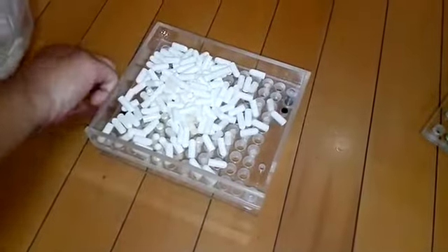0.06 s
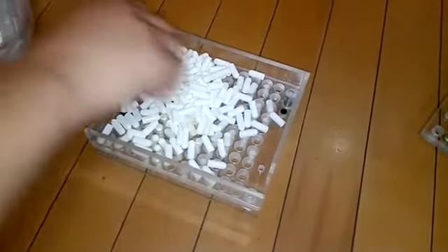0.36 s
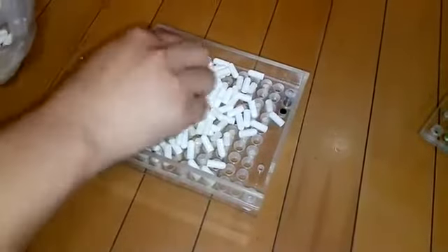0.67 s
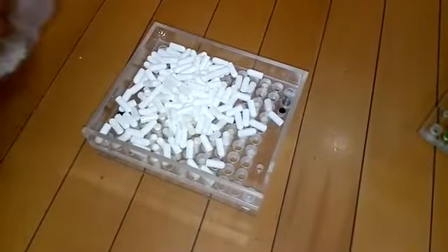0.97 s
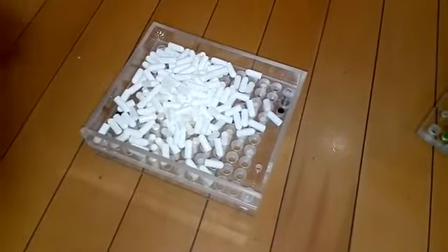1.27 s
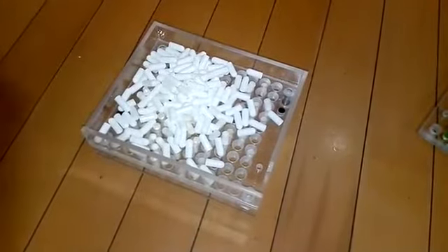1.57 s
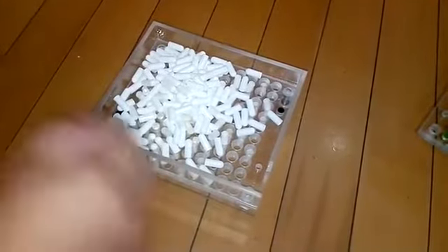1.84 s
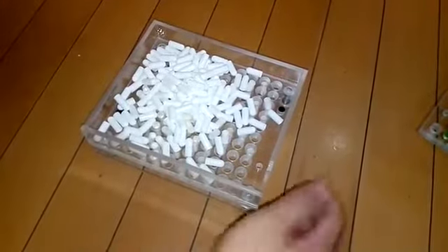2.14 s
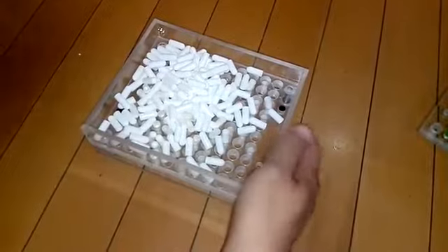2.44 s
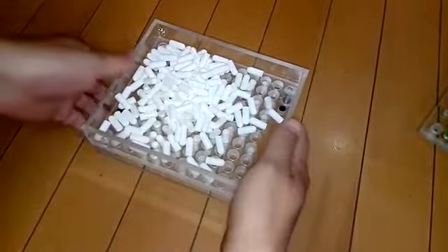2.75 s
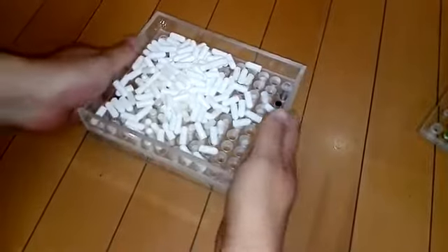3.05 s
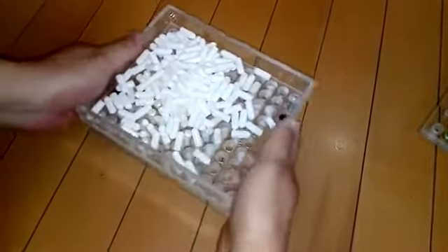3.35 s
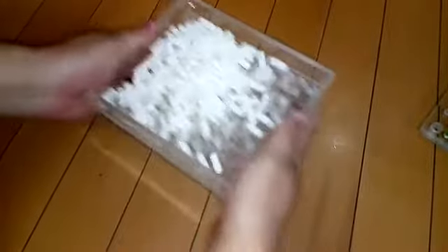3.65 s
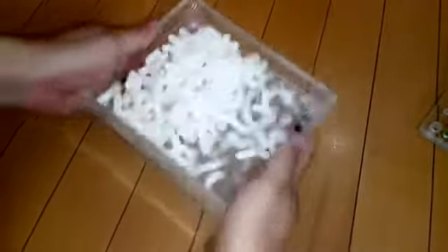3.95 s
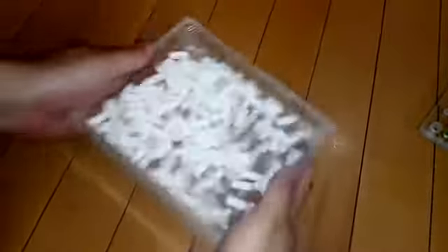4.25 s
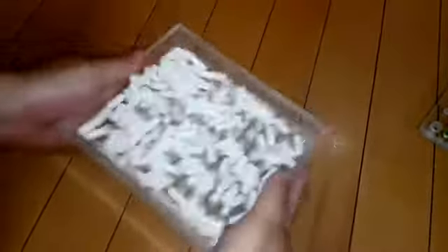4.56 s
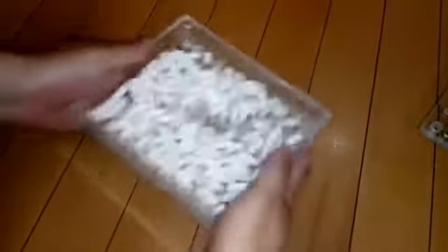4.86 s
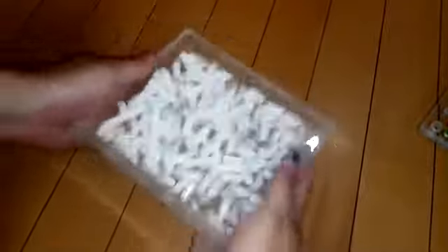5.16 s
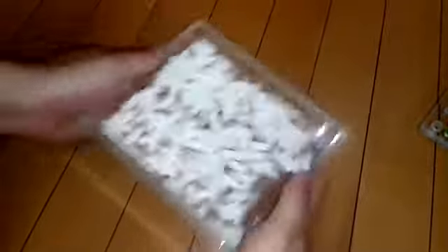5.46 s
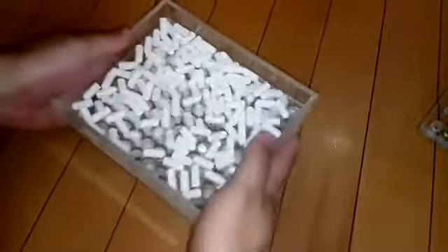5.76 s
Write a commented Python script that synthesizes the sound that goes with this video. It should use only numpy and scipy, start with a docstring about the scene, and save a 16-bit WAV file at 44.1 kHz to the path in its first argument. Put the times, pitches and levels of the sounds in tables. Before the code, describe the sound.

A plastic bag rustles briefly, then small plastic capsules click and rattle loudly as a plastic tray is lifted and shaken.

```python
"""A plastic bag rustles, faintly at first, as it is moved aside and its thin film creases.
Fingers brush a heap of small, hollow plastic capsules in a plastic tray on a wooden floor.
Hands slide onto the tray, which knocks and scrapes on the boards as it is lifted.
One capsule bounces to rest, its shell ringing at each landing. Then the whole heap slides and
rattles, surging at each stroke as the tray is shaken. A small room adds a short echo."""
import sys
import numpy as np
from scipy import signal
from scipy.fft import rfft, irfft, next_fast_len
from scipy.io import wavfile
from scipy.ndimage import map_coordinates

SR = 44100
rng = np.random.default_rng(int(sys.argv[2]) if len(sys.argv) > 2 else 0)


def store_pcm(level_fs):
    """Save levels as 16-bit WAV."""
    pcm = np.round(np.clip(level_fs, -1, 1) * 32767).astype(np.int16)
    wavfile.write(sys.argv[1], SR, np.atleast_2d(pcm).T)


N = 256659

# A level_db compares rows of one table; the functions set the final loudness.
# A fade_s is the time a sound takes to die away by 60 dB.
# tone of the still air: pitch_hz, level_db
AIR_TONE = [(30, -1.5), (120, -23.5), (230, -11.5), (400, -22.5), (630, -24.5), (1000, -20), (2000, -21.5),
            (4000, -43), (6500, -32), (10000, -32.5), (14000, -45)]
# moves of the bag: start_s, level_db, rise_s, hold_s, fade_s
BAG_MOVES = [(0.0, -69.5, 0.0037, 0.64, .1), (.52, -59, .12, 0.044, .17), (.852, -35.7, 0.105, .085, 0.7),
             (1.1, -57.5, 0.068, 0.33, 0.59), (1.365, -42.3, 0.085, 0.085, 0.38),
             (1.78, -58.5, 0.16, 0.078, 0.12)]
# tone of the bag's fine crinkle: pitch_hz, level_db
CRINKLE_TONE = [(530, -30), (900, -20.5), (1060, -19.5), (1500, -14.5), (1780, -14.5), (2400, -12),
                (2720, -9), (3430, -8.5), (4130, -4), (5020, -3), (5900, -11.5), (7350, -15), (9690, -25.5),
                (11900, -30.5), (14200, -40)]
# tone of the bag's larger folds: pitch_hz, level_db
FOLD_TONE = [(100, -30), (170, -0.5), (250, -1.5), (380, 0.5), (520, -12), (750, 4.5), (950, 3.5),
             (1300, -9), (1600, -7), (2200, -13), (6000, -17)]
# single capsules clicking inside the bag: start_s, level_db, pitch_hz
BAG_CAPSULE_CLICKS = [(0.096, -50, 3800), (0.197, -52, 4680), (0.242, -46, 4900), (1.0479, -21, 5100),
                      (1.0566, -23, 4250), (1.338, -31, 4650), (1.6822, -50, 3690), (1.7535, -48, 4660),
                      (1.8693, -46, 4690), (1.9077, -45, 4880), (1.9625, -39, 4610)]
# the tray's edge meeting the floor: start_s, level_db, favoured_pitch_hz, falloff_db_per_octave
TRAY_KNOCKS = [(.094, -50.5, 450, 7), (2.612, -52, 795, 5), (2.689, -53, 900, 8), (2.758, -31.5, 716, 20),
               (2.901, -28.5, 1120, 3), (2.990, -28, 490, 7)]
# notes of the tray and floorboards ringing together: pitch_hz, level_db, fade_s
TRAY_NOTES = [(185, -10, 0.17), (245, -7.5, 0.13), (420, -8.5, 0.07), (478, -10, 0.07), (580, -6.5, 0.05),
              (716, -2, 0.028), (1022, 1, 0.045), (1125, 0, 0.028), (1225, 0, 0.018), (2050, -2.5, 0.016)]
# how well the tray and its base plate give off each pitch: pitch_hz, level_db
TRAY_TONE = [(100, -57), (260, -35), (400, -32), (550, -31.5), (1000, -12.5), (1180, -15.5), (1570, -6),
             (1720, -8.5), (1950, -3), (2250, -3.5), (2480, -5.5), (2950, -1.5), (3300, -2.5), (3780, -1.5),
             (4450, -2), (4700, -2), (5100, 0), (6800, -3), (8300, -14), (10000, -21), (12000, -22),
             (14300, -34.5)]
# capsules nudged by a fingertip or a jolt of the tray: start_s, level_db, pitch_hz
CAPSULE_NUDGES = [(.4205, -52, 4910), (.4865, -48, 3770), (.4998, -41, 4450), (.5312, -46, 3970),
                  (.5504, -49, 3850), (.5715, -44, 4500), (.6434, -44, 4300), (.7033, -50, 4860),
                  (.7213, -48, 4770), (2.6358, -45, 4580), (2.6882, -46, 3730), (2.766, -44, 4510),
                  (2.7795, -39, 3780), (2.8383, -45, 4330), (2.9017, -39, 4430)]
# runs of faint, fine ticking: start_s, level_db, rise_s, hold_s, fade_s
TICKING_RUNS = [(.43, -59.5, .08, .13, .18), (1.665, -59.5, .06, .13, .6), (2.8, -55, .03, .07, .3),
                (3.19, -52, .03, .04, .25)]
# hands sliding onto the tray: start_s, level_db, rise_s, hold_s, fade_s
HAND_SLIDES = [(2.0, -73.5, 0.17, 0.43, 0.33), (2.2, -68, 0.26, 0.088, 0.27),
               (2.42, -60.5, 0.1, 0.706, 0.36), (2.76, -53, 0.011, 0.0067, 0.17)]
# tone of skin rubbing the rim: pitch_hz, level_db
SKIN_TONE = [(240, -48), (400, -10), (694, -8.5), (854, -11), (991, -6.5), (1260, -8.5), (2150, -3),
             (2690, 0.5), (4200, 1.5), (5200, 1.5), (7170, -10.5), (14000, -29)]
# a loose capsule dropping on the tray:
# start_s, level_db, pitch_hz, ring_length_ratio, snap_offset_db, first_flight_s, landing_count
CAPSULE_DROPS = [(3.0805, -20, 4100, .65, -18, 0, 1), (3.105, -23, 4130, .65, -16, .0335, 3),
                 (3.189, -29, 4100, .6, -21, .0146, 7), (3.278, -24.5, 3930, .9, 4, 0, 1),
                 (3.373, -24, 3930, 1.05, 2.5, 0, 1), (3.4665, -23.5, 3930, 1.0, 2, 0, 1),
                 (3.5215, -26, 3950, .9, -2, 0, 1), (3.5586, -30, 3930, 1.0, -3, .031, 2),
                 (3.6007, -28.5, 3840, .7, -12, 0, 1)]
# notes of the bouncing capsule's shell: pitch_ratio, level_db, fade_s
SHELL_NOTES = [(0.276, -11.5, 0.024), (0.41, -8, 0.009), (0.55, -6.5, 0.012), (0.769, -8.5, 0.012),
               (0.959, 2.5, 0.011), (1.007, 3.5, 0.013), (1.18, -3, .008), (1.32, -19, 0.046),
               (1.651, -5, 0.0043)]
# strokes of the shaking, each throwing the heap against a wall: arrival_s, level_db, hold_s
SHAKE_STROKES = [(3.78, -40.5, 0.041), (3.91, -35, 0.038), (4.075, -38.5, 0.014), (4.194, -34, 0.1),
                 (4.577, -36, 0.022), (4.898, -34.5, 0.1), (5.15, -37, 0.053), (5.31, -39, 0.12),
                 (5.495, -33, 0.073), (5.81, -31, .02)]
# the hardest hits of capsules on the tray's walls: start_s, level_db, pitch_hz
WALL_HITS = [(3.6657, -32, 4530), (3.7146, -32, 4420), (3.7723, -19, 4660), (3.8822, -21, 3750),
             (3.923, -18, 4060), (3.9559, -20, 4220), (3.9885, -19, 3980), (4.0089, -19, 4890),
             (4.0573, -20, 3920), (4.0888, -20, 5330), (4.136, -15, 4700), (4.1735, -15, 4640),
             (4.1895, -16, 3760), (4.2255, -18, 4130), (4.2305, -17, 4500), (4.2792, -14, 3780),
             (4.3748, -15, 4840), (4.4484, -18, 4910), (4.5128, -22, 3910), (4.5735, -20, 3900),
             (4.5908, -14, 3950), (4.633, -20, 4030), (4.6425, -21, 3690), (4.656, -19, 3800),
             (4.7366, -19, 5600), (4.7682, -23, 4540), (4.8663, -16, 4600), (4.9007, -17, 3750),
             (4.9037, -11.5, 3750), (4.9383, -16.5, 4700), (4.9502, -18, 3850), (4.987, -20, 4400),
             (5.0396, -20, 4400), (5.0848, -17, 4700), (5.1542, -14, 4200), (5.1956, -17.5, 4340),
             (5.2015, -17, 4100), (5.214, -20, 4300), (5.2528, -21, 4080), (5.296, -19, 4060),
             (5.3529, -21, 5560), (5.3717, -15, 4070), (5.4362, -20, 4170), (5.4811, -16, 4460),
             (5.4877, -14.5, 4600), (5.4978, -17, 5100), (5.5035, -18, 4450), (5.5115, -19, 4400),
             (5.519, -13, 4950), (5.536, -15, 4350), (5.5405, -15, 4900), (5.558, -18, 4500),
             (5.6018, -18, 4960), (5.6743, -22, 3860), (5.7076, -22, 4340), (5.7237, -16, 3770),
             (5.7297, -17, 3840), (5.7894, -15, 3850), (5.809, -16, 3900)]
# how alike left and right sound (1 is the same, 0 unrelated): pitch_hz, likeness_ratio
STEREO_LIKENESS = [(60, .999), (130, 1), (300, 0.77), (700, 0), (2000, 0.97), (8000, 0.25)]
# how long the room echoes: pitch_hz, fade_s
ROOM_FADES = [(200, 0.29), (1000, 0.27), (4000, 0.38), (12000, 0.076)]

SLIDE_START_S = 3.57  # the tray tilts and the heap starts to slide


def amp(db):
    """Turn decibels into a number to multiply by."""
    return 10 ** (np.asarray(db) / 20)


def unit(x):
    """Scale a sound to an average strength (rms) of 1."""
    return x / np.sqrt(np.mean(x ** 2) + 1e-20)


def fade(t, fade_s):
    """Die away, reaching 60 dB down after fade_s."""
    return np.exp(-np.log(1000) * t / fade_s)


def along(points, hz):
    """Read between the rows of a (pitch_hz, value) table, spacing octaves evenly."""
    pitches, values = np.transpose(points)
    return np.interp(np.log(hz + 1), np.log(pitches + 1), values)


def filtered(x, response):
    """Multiply each pitch in a sound by response(hz)."""
    size = next_fast_len(N + SR // 2)
    return irfft(rfft(x, size) * response(np.fft.rfftfreq(size, 1 / SR)), size)[..., :N]


def coloured(x, tone, size=4096):
    """Give a sound the tone in a table, keeping the sharp start of each click."""
    cepstrum = irfft(np.log(amp(along(tone, np.fft.rfftfreq(size, 1 / SR)))))
    # move all of the filter's ringing to after the click
    cepstrum[1:size // 2] *= 2
    cepstrum[size // 2 + 1:] = 0
    click_response = irfft(np.exp(rfft(cepstrum)))
    return signal.fftconvolve(x, click_response[None], axes=1)[:, :N]


def band(x, low_hz, high_hz, order=3):
    """Keep a range of pitches: a slow contact makes little treble, a small body little bass."""
    return signal.sosfilt(signal.butter(order, [low_hz, high_hz], "bandpass", fs=SR, output="sos"), x)


def spread(pair):
    """Blend two unrelated sounds into a left and right that are alike in the bass."""
    def shares(hz):
        angle = np.arccos(np.clip(along(STEREO_LIKENESS, hz), -1, 1)) / 2
        return np.array([np.cos(angle), np.sin(angle)])
    mid, side = filtered(pair, shares)
    return unit(np.array([mid + side, mid - side]))


def panned(db):
    """Left and right gains, with the left louder by db."""
    return amp(np.array([db, -db]) / 2)


def lagged(pair, lag_s=.00136, share=.25):
    """Part of the sound on the left reaches the right a moment later."""
    late = filtered(pair[0], lambda hz: np.exp(-2j * np.pi * hz * lag_s))
    return np.array([pair[0], np.sqrt(1 - share ** 2) * pair[1] + share * late])


def place(times, waves):
    """Add short waves, shaped (2, events, samples), to a stereo track at their times."""
    at = np.round(np.abs(times) * SR).astype(int)[:, None] + np.arange(waves.shape[-1])
    return np.array([np.bincount(at.ravel(), side.ravel(), N)[:N] for side in waves])


def wobble(per_s):
    """A smooth curve through per_s random values a second."""
    return map_coordinates(rng.standard_normal(int(N * per_s / SR) + 4), [np.arange(N) * per_s / SR])


def swell(start_s, level_db, rise_s, hold_s, fade_s):
    """The loudness of one movement: it rises smoothly, holds and dies away."""
    t = np.arange(N) / SR - start_s
    rise = np.sin(np.pi / 2 * np.clip(t / rise_s, 0, 1)) ** 2
    return amp(level_db) * rise * fade(np.maximum(t - rise_s - hold_s, 0), fade_s)


def swells(rows):
    """The combined loudness of overlapping movements."""
    return np.sqrt(sum(swell(*row) ** 2 for row in rows))


def shifting(x, depth_db, width_hz, life_s, size=256):
    """As loose things shift about, each range of pitches swells and sinks by itself."""
    hz, t, spectrum = signal.stft(x, SR, nperseg=size)
    grid = rng.standard_normal((int(hz[-1] / width_hz) + 4, int(t[-1] / life_s) + 4))
    drift = map_coordinates(grid, np.meshgrid(hz / width_hz, t / life_s, indexing="ij"))
    shifted = signal.istft(spectrum * amp(depth_db * np.clip(drift, -2, 1.5)), SR, nperseg=size)[1][:, :N]
    return shifted * np.linalg.norm(x) / np.linalg.norm(shifted)


def crackle(per_s, scatter_db, hiss):
    """Tiny snaps of mixed sizes over the hiss of rubbing."""
    count = int(per_s * N / SR)
    sizes = amp(scatter_db * np.clip(rng.standard_normal(count), -2, 2))
    snaps = place(rng.uniform(0, N / SR, count), (sizes * rng.standard_normal((2, count)))[..., None])
    return unit(unit(snaps) + hiss * rng.standard_normal((2, N)))


def clacks(hz, fade_s, crack, crack_fade_s, phase_spread=np.pi, size=640):
    """One equally strong clack per pitch: a crack of contact plus the ring of thin plastic."""
    t = np.arange(size) / SR
    chance = rng.standard_normal((len(hz), 2, size + 2)).transpose(1, 0, 2)
    phase = phase_spread * chance[..., :1]  # each lies at its own distance from left and right
    ring_s = fade_s * amp(2.0 * chance[0, :, 1:2])  # its neighbours muffle it more or less
    ring = np.sin(2 * np.pi * hz[:, None] * t + phase) * fade(t, ring_s)
    contact = crack * np.tanh(chance[..., 2:]) * fade(t, crack_fade_s)
    waves = (ring + contact) * (1 - np.exp(-t / 0.00029))
    return waves * np.linalg.norm(fade(t, fade_s)) / np.linalg.norm(waves, axis=-1, keepdims=True) / 2


def collisions(start_s, end_s, per_s, scatter_db, fade_s, crack, shell_hz=4400, pitch_spread=0.1194):
    """Capsules clack in the tray at random times, sizes and pitches."""
    count = int(per_s * (end_s - start_s))
    times = rng.uniform(start_s, end_s, count)
    size, detune = rng.standard_normal((2, count))
    sizes = amp(scatter_db * np.clip(size, -2, 1.4))
    hz = shell_hz * np.exp(pitch_spread * detune)
    waves = sizes[:, None] * clacks(hz, fade_s, crack, crack_fade_s=.006)
    return unit(coloured(place(times, waves), TRAY_TONE)) * np.sqrt((end_s - start_s) * SR / N)


def room_tone():
    """Faint air noise, and a low drone that is the same on both sides."""
    air = spread(filtered(rng.standard_normal((2, N)), lambda hz: amp(along(AIR_TONE, hz))))
    drone = unit(band(rng.standard_normal(N), low_hz=40, high_hz=60, order=2))
    return amp(-72.5) * air + amp(-80) * drone


def bag_rustle():
    """Thin film crinkles in countless creases, while its larger folds flutter lower down."""
    crinkle = unit(coloured(crackle(per_s=1300, scatter_db=3.5, hiss=.9), CRINKLE_TONE))
    crinkle = shifting(crinkle, depth_db=3, width_hz=380, life_s=.024)
    folds = spread(coloured(crackle(per_s=500, scatter_db=3.5, hiss=1.0), FOLD_TONE))
    start_s, db, hz = np.transpose(BAG_CAPSULE_CLICKS)
    capsule_clicks = clacks(hz, fade_s=0.0091, crack=0.79, crack_fade_s=0.012, phase_spread=0.65)
    snaps = coloured(place(start_s, amp(db)[:, None] * capsule_clicks), TRAY_TONE)
    bunches = amp(1.2 * wobble(per_s=92))  # creases give way in small bunches
    film = bunches * swells(BAG_MOVES) * (amp(0.5) * crinkle + amp(-19.5) * folds)
    return (film + amp(8.5) * snaps) * panned(1.3)[:, None]


def tray_knocks():
    """The tray's edge bumps the boards; where it lands decides which notes ring most."""
    start_s, db, favoured_hz, falloff_db = np.transpose(TRAY_KNOCKS)
    count = len(start_s)
    t = np.arange(SR // 6) / SR
    waves = np.zeros((2, count, len(t)))
    for hz, note_db, fade_s in TRAY_NOTES:
        octaves_away = np.abs(np.log2(hz / favoured_hz))
        strength = amp(db + note_db - falloff_db * octaves_away + rng.normal(0, 1, count))
        phase = rng.normal(0, 0.95, (count, 1)) + rng.normal(0, 0.26, (2, count, 1))
        waves += strength[:, None] * np.sin(2 * np.pi * hz * t + phase) * fade(t, fade_s)
    knocks = band(place(start_s, waves * (1 - np.exp(-t / 0.00047))), low_hz=136, high_hz=2420)
    return amp(-5.5) * knocks * panned(5.7)[:, None]


def finger_nudges():
    """Fingers brush the heap or jolt the tray, and a few capsules click."""
    start_s, db, hz = np.transpose(CAPSULE_NUDGES)
    clicks = clacks(hz, fade_s=.009, crack=1.0, crack_fade_s=.008, phase_spread=.8)
    return amp(9.0) * coloured(place(start_s, amp(db)[:, None] * clicks), TRAY_TONE)


def capsule_ticking():
    """Shifting capsules tick so close together that they almost merge into a fine scrape."""
    ticks = collisions(0, SLIDE_START_S, per_s=220, scatter_db=4.5, fade_s=.009, crack=.9,
                       shell_hz=4500, pitch_spread=.09)
    return swells(TICKING_RUNS) * ticks


def bag_settle():
    """The bag is let go and slides softly to rest, duller than its crinkle."""
    rub = unit(band(crackle(per_s=1200, scatter_db=3.5, hiss=0.97), low_hz=1310, high_hz=2670, order=2))
    return swell(start_s=1.699, level_db=-63, rise_s=0.26, hold_s=0.048, fade_s=0.13) * rub


def hand_rub():
    """Skin drags over the tray's rim, catching and slipping unevenly."""
    skin = coloured(crackle(per_s=1800, scatter_db=8.5, hiss=1.0), SKIN_TONE)
    rub = unit(band(skin, low_hz=350, high_hz=7160))
    rub = unit(shifting(rub, depth_db=2, width_hz=600, life_s=.03) * amp(1.8 * wobble(per_s=45)))
    return amp(3.5) * swells(HAND_SLIDES) * rub * panned(0.9)[:, None]


def tray_scrape():
    """The tray's feet catch and slip on the boards before they lift off."""
    slips = unit(band(crackle(per_s=270, scatter_db=5, hiss=0.72), low_hz=358, high_hz=1200, order=4))
    return swell(start_s=2.76, level_db=-58.5, rise_s=0.015, hold_s=0.11, fade_s=1) * slips


def landings(flight_ratio=.89, loss_db=1.5):
    """One row per landing: each bounce of a drop is shorter and softer than the last."""
    return [(start_s + flight_s * np.sum(flight_ratio ** np.arange(k)), db - loss_db * k, *timbre)
            for start_s, db, *timbre, flight_s, count in CAPSULE_DROPS for k in range(count)]


def capsule_bounces():
    """At each landing the shell rings and the tray's base buzzes; landing on its end snaps more."""
    start_s, db, pitch_hz, ring_length, snap_db = np.transpose(landings())
    count = len(start_s)
    t = np.arange(SR // 10) / SR
    ring = np.zeros((2, count, len(t)))
    for ratio, note_db, fade_s in SHELL_NOTES:
        phase = rng.normal(0, .8, (count, 1)) + rng.normal(0, .55, (2, count, 1))
        phase = phase + np.cumsum(rng.normal(0, .06, ring.shape[1:]), axis=-1)  # roughens the note
        # notes far from the main pitch depend on how the capsule lands
        hz = ratio * pitch_hz * np.exp(0.116 * np.log(ratio) * rng.standard_normal(count))
        ring_s = fade_s * ring_length[:, None]
        held = fade(t * t / ring_s, ring_s)  # echoes in the tray hold the ring up briefly
        ring += amp(note_db) * np.sin(2 * np.pi * hz[:, None] * t + phase) * held
    ring *= (1 - np.exp(-t / 0.00054)) * panned(-0.4)[:, None, None]
    shell = coloured(place(start_s, amp(db - 4.5)[:, None] * ring), TRAY_TONE)
    snaps = amp(db + snap_db)[:, None] * np.tanh(rng.standard_normal(ring.shape)) * fade(t, .011)
    buzz_gain = amp(db - 14) * np.hypot(.5, amp(snap_db))
    buzz = buzz_gain[:, None] * np.tanh(rng.standard_normal(ring.shape)) * fade(t, .14)
    return (band(shell, low_hz=1160, high_hz=7960)
            + band(coloured(place(start_s, buzz), TRAY_TONE), low_hz=1000, high_hz=7500)
            + band(place(start_s, snaps), low_hz=1600, high_hz=6950))


def heap_motion(stroke_rise_s=0.047, stroke_fade_s=0.08):
    """How hard the heap moves: a creep, then steady shaking with a surge at every stroke."""
    creep = swell(SLIDE_START_S, level_db=-46, rise_s=0.013, hold_s=N / SR, fade_s=0.64)
    shaking = swell(start_s=3.636, level_db=-35, rise_s=0.32, hold_s=1.742, fade_s=0.64)
    surges = swells((arrival_s - stroke_rise_s, db, stroke_rise_s, hold_s, stroke_fade_s)
                    for arrival_s, db, hold_s in SHAKE_STROKES)
    return np.sqrt(creep ** 2 + shaking ** 2 + surges ** 2)


def heap_rattle():
    """Capsules jostle in clumps: a dense patter under clearer clacks and stray hits on the walls."""
    span_s = SLIDE_START_S, N / SR
    patter = collisions(*span_s, per_s=700, scatter_db=2.7, fade_s=.0062, crack=3.8)
    patter = shifting(patter, depth_db=2.2, width_hz=600, life_s=.012)
    clear = collisions(*span_s, per_s=280, scatter_db=3.6, fade_s=.008, crack=1.5)
    strays = collisions(*span_s, per_s=24, scatter_db=2, fade_s=.009, crack=.9)
    rattle = lagged(patter + 1.1 * clear + amp(-8) * strays) * panned(2.0)[:, None]
    clumps = amp(.7 * wobble(per_s=70))
    return amp(-3.3) * heap_motion() * clumps * rattle


def wall_hits():
    """A capsule strikes the tray's wall hard: one end first, then the other at another pitch."""
    start_s, db, hz = np.transpose(WALL_HITS)
    gain = amp(db)[:, None] * panned(2.8)[:, None, None]
    other_hz = hz * np.exp(.14 * rng.standard_normal(len(hz)))
    first = place(start_s, gain * clacks(hz, fade_s=.0085, crack=1.1, crack_fade_s=.006, phase_spread=.7))
    other_s = start_s + rng.uniform(.001, .0022, len(hz))
    second = place(other_s, gain * clacks(other_hz, fade_s=.007, crack=1.3, crack_fade_s=.007))
    return amp(9) * band(coloured(first + amp(-5) * second, TRAY_TONE), low_hz=590, high_hz=7200, order=2)


def palm_bump(pitch_hz=105):
    """The tray bumps a palm with one soft, dull thud."""
    loudness = swell(start_s=4.12, level_db=-62, rise_s=0.022, hold_s=0, fade_s=.1)
    return loudness * np.sin(2 * np.pi * pitch_hz * np.arange(N) / SR)


def room_echo(x, pieces=12):
    """The room's echo changes as the sound moves about; the highest pitches die first."""
    echo = np.zeros((2, N + 2 * SR))
    hop = N // pieces + 1
    for start in range(0, N, hop):
        hz, t, noise = signal.stft(rng.standard_normal((2, SR // 2)), SR, nperseg=256)
        tail = signal.istft(noise * fade(t, along(ROOM_FADES, hz)[:, None]), SR, nperseg=256)[1]
        tail *= 1 - np.exp(-np.arange(tail.shape[1]) / SR / 0.00074)
        answer = signal.fftconvolve(x[:, start:start + hop], tail / np.linalg.norm(tail[0]), axes=1)
        echo[:, start:start + answer.shape[1]] += answer
    return echo[:, :N]


def scene():
    """Everything sounds in one small room; bounces, knocks and hits get less echo and stand out."""
    handling = (bag_rustle() + bag_settle() + finger_nudges() + capsule_ticking()
                + hand_rub() + tray_scrape() + heap_rattle())
    bounces, knocks, hits = capsule_bounces(), tray_knocks(), wall_hits()
    echo = room_echo(amp(-4.0) * handling + amp(-11) * bounces + amp(-7.5) * knocks + amp(-8) * hits)
    return handling + bounces + knocks + hits + palm_bump() + echo + room_tone()


def record(dry, mono_below_hz=220, top_hz=14250):
    """Make the bass alike on both sides and cut off the very highest pitches."""
    mid = (dry[0] + dry[1]) / 2
    side = filtered((dry[0] - dry[1]) / 2, lambda hz: hz ** 2 / (hz ** 2 + mono_below_hz ** 2))
    return filtered(np.array([mid + side, mid - side]), lambda hz: hz < top_hz)


dry = scene()
out = record(dry)
store_pcm(out)
```